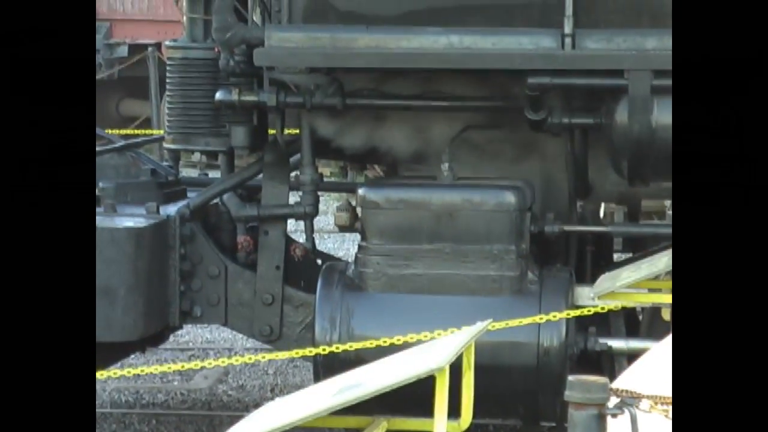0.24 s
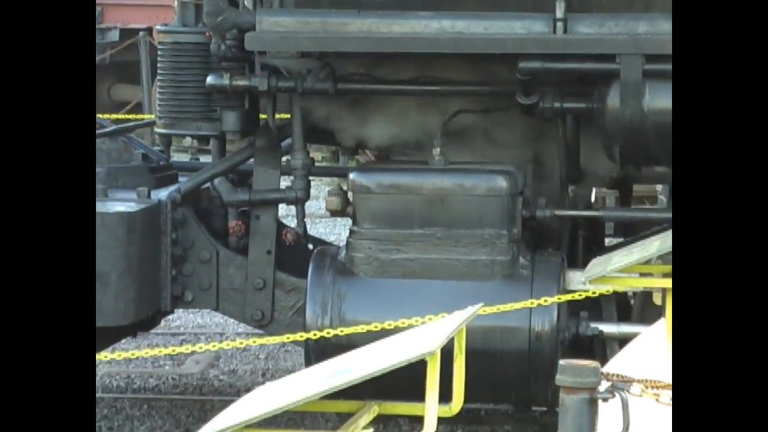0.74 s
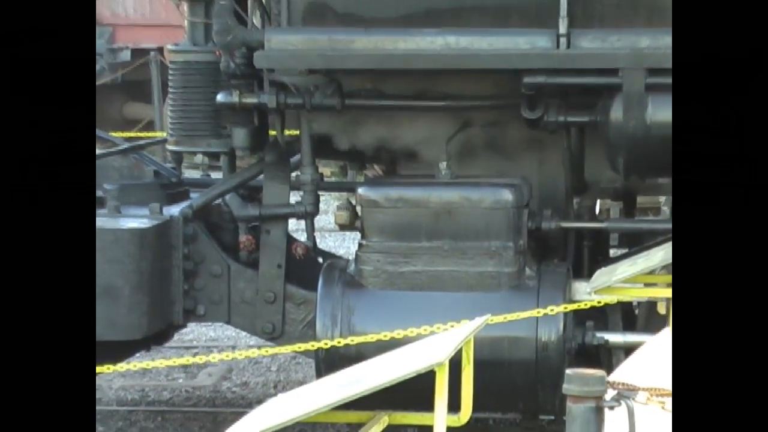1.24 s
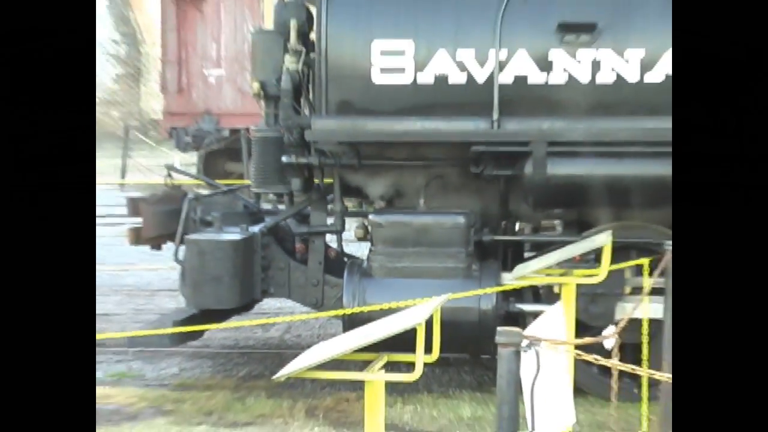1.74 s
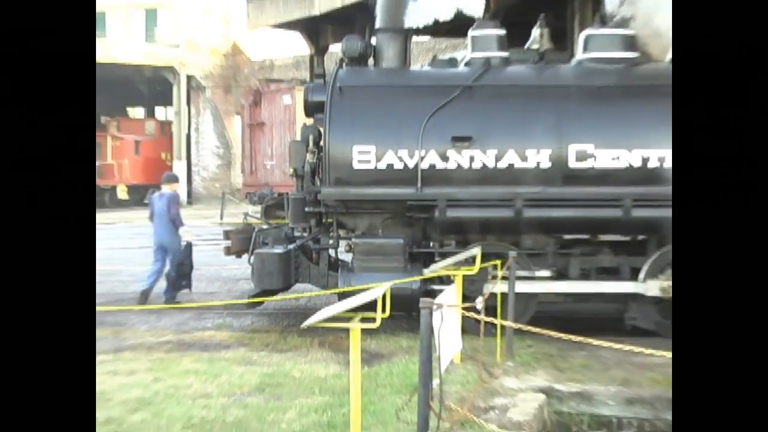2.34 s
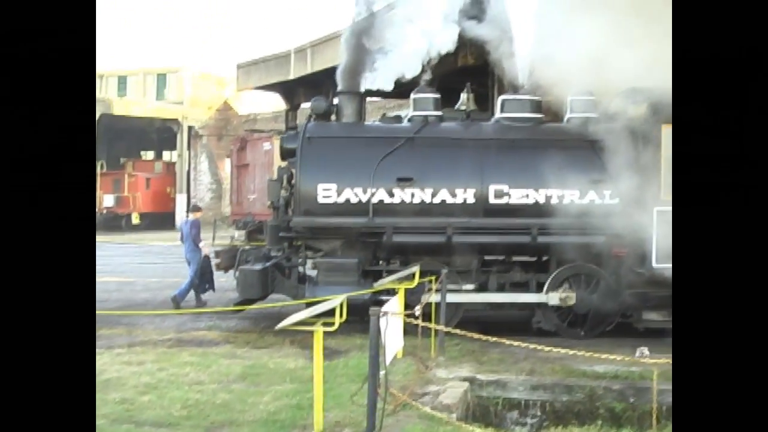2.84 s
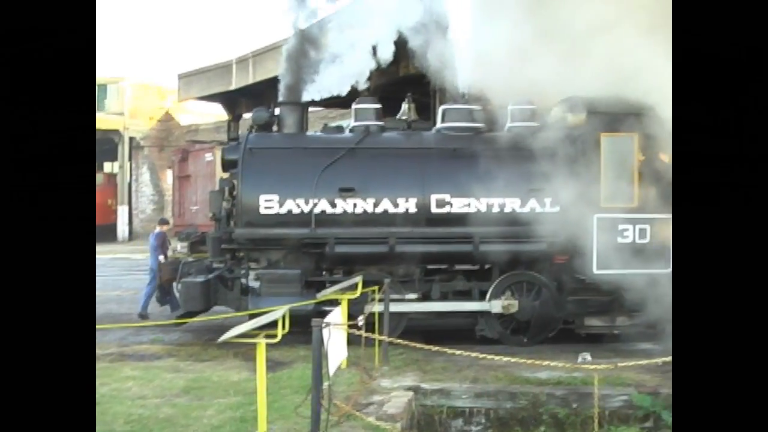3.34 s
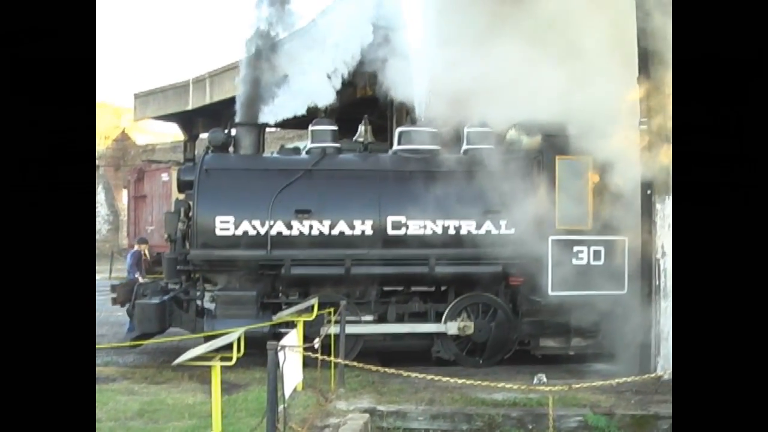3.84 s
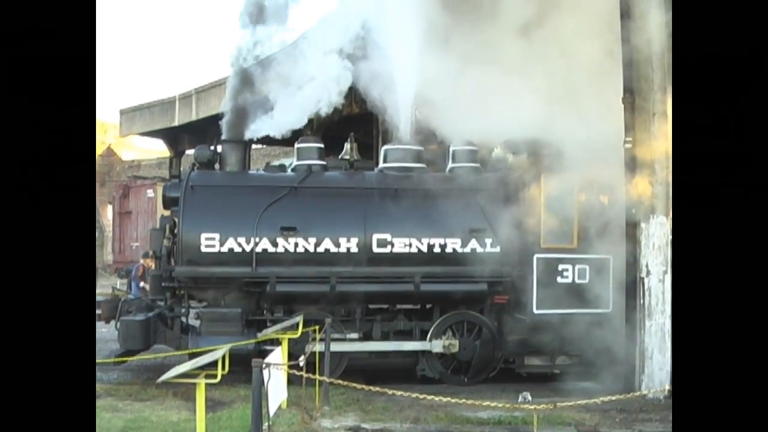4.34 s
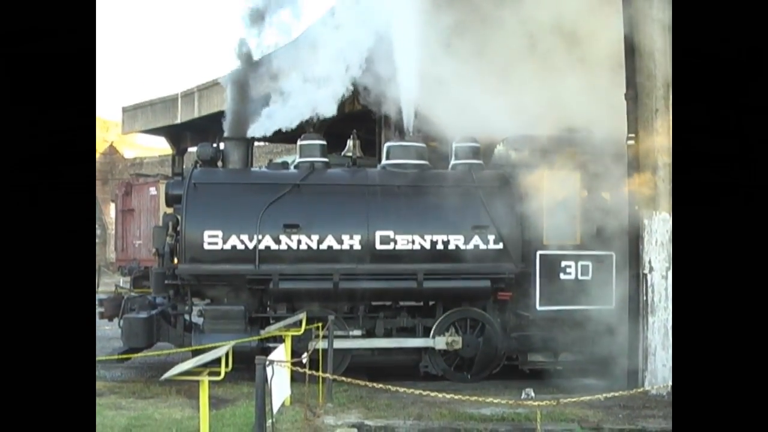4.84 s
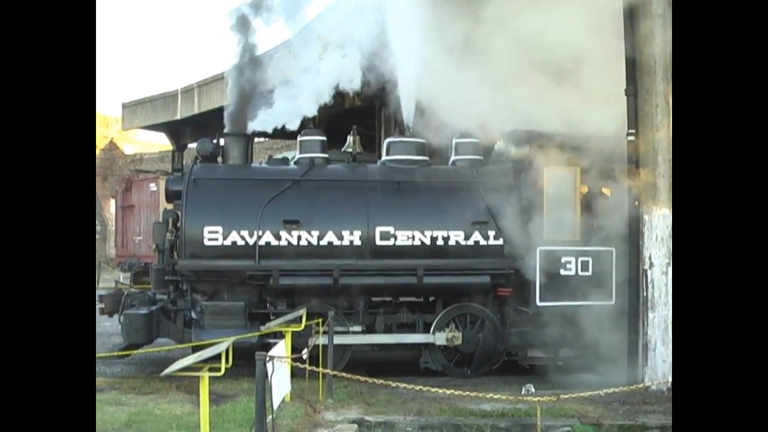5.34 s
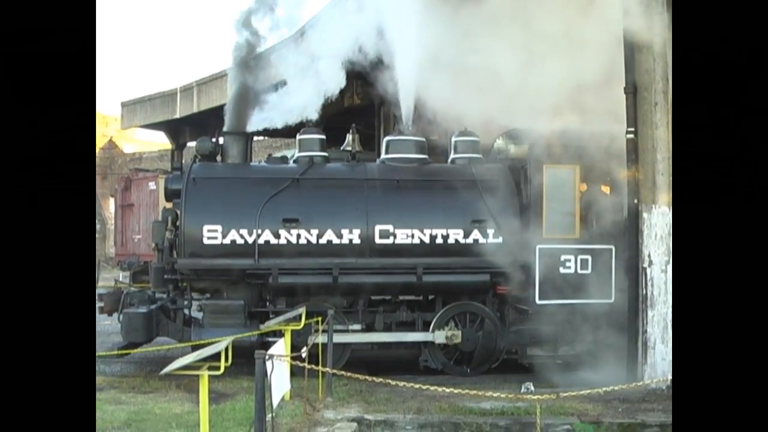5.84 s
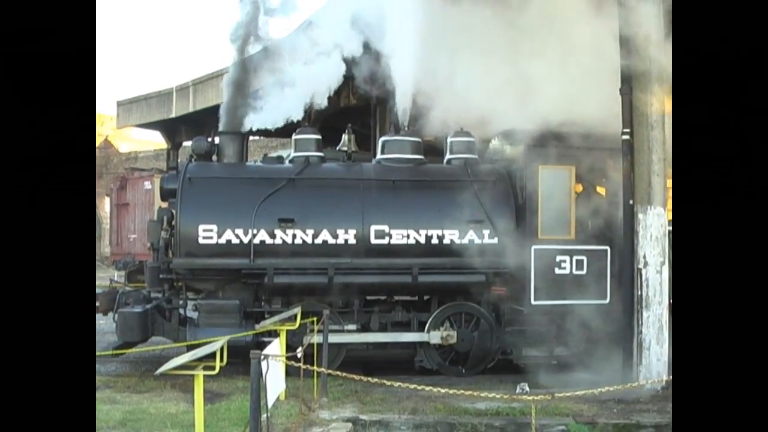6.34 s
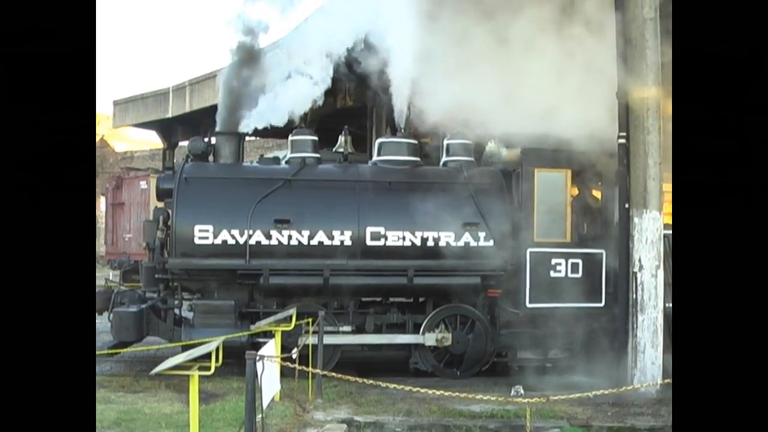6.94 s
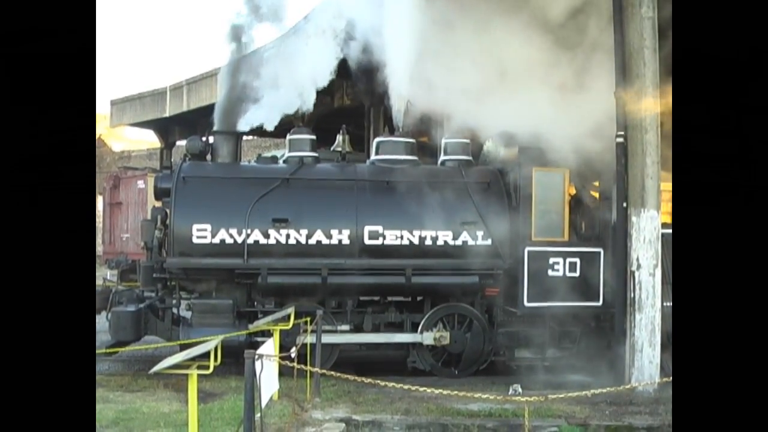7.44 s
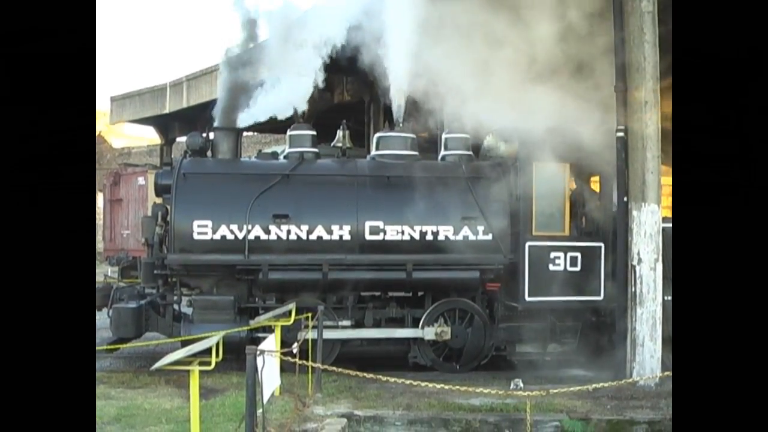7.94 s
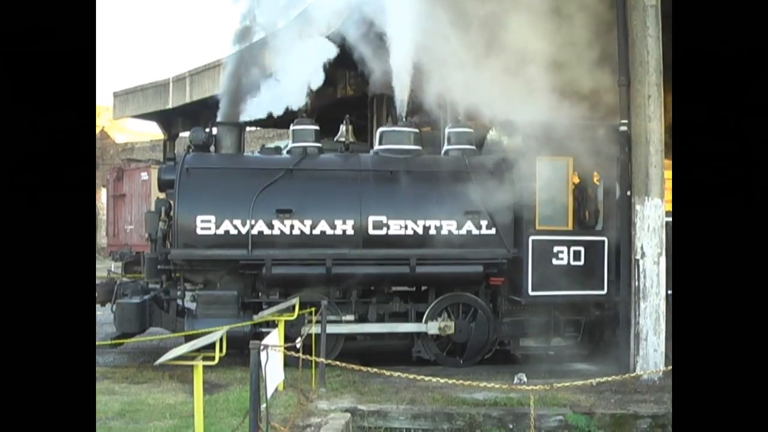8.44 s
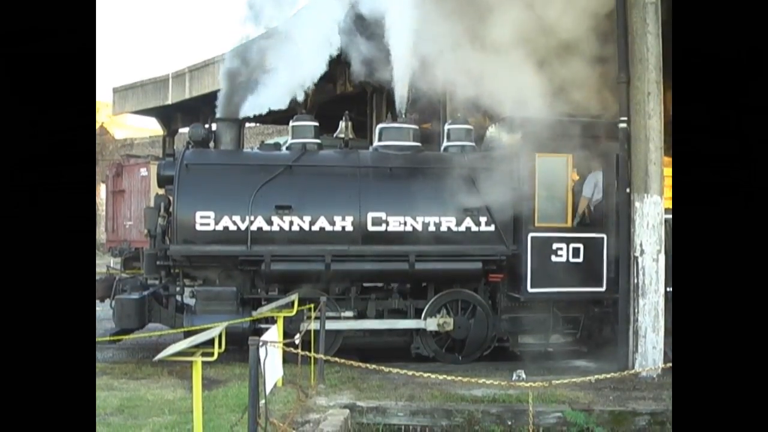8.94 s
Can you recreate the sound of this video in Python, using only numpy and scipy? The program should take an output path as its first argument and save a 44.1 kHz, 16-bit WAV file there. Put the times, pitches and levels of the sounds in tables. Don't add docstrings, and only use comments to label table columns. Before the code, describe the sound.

Loud continuous high-pitched steam hiss from a locomotive safety valve, nearly constant, with slight flutter and a thinner, whistlier edge in the second half.

```python
import sys
import numpy as np
from scipy import signal
from scipy.io import wavfile
from scipy.ndimage import uniform_filter1d, map_coordinates

SR = 44100
rng = np.random.default_rng(int(sys.argv[2]) if len(sys.argv) > 2 else 0)


def volts(x):
    e = np.asarray(x, float) / 20
    return 10 ** e


def generate_wav(sig):
    pcm = np.round(np.clip(np.atleast_2d(sig).T, -1, 1) * 32767).astype(np.int16)
    wavfile.write(sys.argv[1], SR, pcm)


N = 405719
FRAME, HOP = 2048, 512
T = np.arange(N // HOP + 2) * HOP / SR
F = np.arange(FRAME // 2 + 1) * SR / FRAME


def cells():
    noise = rng.standard_normal((len(T) - 1) * HOP)
    return signal.stft(noise, nperseg=FRAME, noverlap=FRAME - HOP)[2]


def sound(z):
    return signal.istft(z, nperseg=FRAME, noverlap=FRAME - HOP)[1][..., :N]


def over_hz(table):
    hz, *values = np.transpose(table)
    return np.array([np.interp(np.log(F + 1), np.log(hz), v)[:, None] for v in values])


def bump(hz, width_hz):
    return 1 / (1 + (2 * (F[:, None] - hz) / width_hz) ** 2)


def walk(rate, count):
    k = max(int(SR / HOP / rate), 1)
    rows = rng.standard_normal((count, len(T)))
    rows = uniform_filter1d(uniform_filter1d(rows, k), k)
    rows /= rows.std()
    place = np.interp(np.log(F + 1), np.log([100, 16000]), [0, count - 1])
    grid = np.meshgrid(place, np.arange(len(T)), indexing="ij")
    return map_coordinates(rows, grid, order=1)


def quick(rows):
    return rows - uniform_filter1d(rows, int(SR / HOP / 6))


# frequency in Hz, density in dB per Hz.
JET = [(15, -71), (25, -39.5), (314, -22), (369, -23), (422, -24), (873, -17), (1050, -17.5), (1490, -12.5),
       (2010, -9.5), (2930, -7.5), (4510, -6.5), (5440, -1), (7720, 0.5), (11300, -8), (15500, -28.5)]
FLOW_HZ = (110, 300, 800, 1900, 3000, 3800, 6500, 12800, 14800)
# level in dB at full lift, level in dB at low lift, dB per unit of boiler pressure.
LAYERS = [
    (0.9, -0.7, 1.5),
    (1.8, -2, -0.5),
    (-1.08, 1.5, -0.2),
    (.5, -0.4, -0.2),
    (-1.84, 1.7, -1.5),
    (2, -1, -0.5),
    (.7, -0.5, .1),
]
# time in seconds, pressure against the mean in arbitrary units.
PRESSURE = [(0, -1.4), (.5, -0.43), (2.2, 0.042), (2.8, 0.056), (3.4, 0.3), (5.9, 0.66), (6.5, -0.21),
            (8, 0.014), (9.2, 0.27)]


def flow_db(turn):
    reseat_s, reseat_takes_s = 6.0, 0.08
    dropped = np.clip((T - reseat_s) / reseat_takes_s + 0.5, 0, 1)
    pressure = np.interp(T, *np.transpose(PRESSURE))
    levels = []
    for high_db, low_db, slope in LAYERS:
        levels.append(high_db + dropped * (low_db - high_db) + slope * pressure)
    hiss, roar, throat, sizzle, seat, lip, top = levels
    steady = 0 * T
    rows = [steady, roar, roar, steady, throat, throat, hiss, sizzle, top]
    regions = np.eye(len(rows))
    spread = [np.interp(np.log(F + 1), np.log(FLOW_HZ), region) for region in regions]
    db = over_hz(JET)[0] + np.transpose(spread) @ rows
    seat_whistle = bump(7870, 1300) * seat
    lip_tone = bump(9300, 600) * lip * turn
    return db + seat_whistle + lip_tone


# frequency in Hz, width in Hz, gain in dB.
PIPES = [(180, 100, 1), (1230, 31, 0.5), (1610, 66, -1), (605, 50, 2), (1088, 72, 3), (1520, 54, 2.5),
         (2040, 80, 1.5), (2990, 58, -1), (3760, 120, -1), (4680, 170, -1), (4900, 250, 0),
         (5270, 390, -1.5), (5720, 170, -3), (6350, 150, 1), (7040, 230, -2.5), (8070, 230, 2.5),
         (8780, 380, -2), (10600, 320, 1), (12500, 330, 2), (13100, 950, -2), (14400, 900, 1.5),
         (905, 150, -1), (15650, 500, -5)]


def pipes_db():
    return sum(gain_db * bump(hz, width) for hz, width, gain_db in PIPES)


# frequency in Hz, width in Hz, gain in dB when facing away.
SHADOWS = [(3700, 740, -3), (1500, 390, 0.5), (6960, 270, 2), (1090, 150, -2), (8400, 300, 1.5),
           (8900, 300, -1), (10700, 600, -3), (12800, 830, 2)]


def shadow_db(turn):
    return sum(gain_db * bump(hz, width) for hz, width, gain_db in SHADOWS) * (1 - turn)


def eddies_db():
    depth_db = 0.45 * np.clip(F[:, None] / 9000, 0.4, 1.6)
    return depth_db * quick(walk(24, count=14)) + 1.17 * walk(1.3, count=220)


# delay in ms, share of the direct sound facing away, share facing the jet.
ECHOES = [(0.487, -0.11, -.15), (.69, 0.096, .06), (.78, 0.063, 0.14), (1.53, 0.01, -0.051),
          (1.66, 0.032, 0.13), (1.88, 0.092, 0.055), (2.57, -0.077, -.13), (2.72, 0.22, 0.17),
          (3.33, -0.029, 0.0026), (3.8, 0.037, .04), (4.6, 0.12, 0.078), (5.5, -.03, -.04)]


def yard(turn):
    comb = 0
    for ms, away, facing in ECHOES:
        delay = np.exp(-2j * np.pi * F[:, None] * ms / 1000)
        comb = comb + delay * (away + turn * (facing - away))
    echo_top_hz = 6700
    return 1 + comb / (1 + (F[:, None] / echo_top_hz) ** 2)


# frequency in Hz, left minus right level in dB,
# phase lead of the right in radians, level of unrelated side sound in dB.
AWAY = [(30, .3, 0, -16), (200, 3, 0, -6.5), (800, 0.8, 0.068, -10), (1500, -1, 0.16, -24),
        (3700, 0.5, -0.09, -17), (4670, 1, 0, -18), (6200, -0.5, 0, -17), (8300, 1.6, -.05, -20),
        (9600, 5.5, -.05, -13), (10300, 7, 0, -11), (11000, 8, .8, -6), (11900, 9, 1.25, -7),
        (13800, -1, 0.98, -10), (15300, .2, .3, -15)]
# frequency in Hz, left minus right level in dB,
# phase lead of the right in radians, level of unrelated side sound in dB.
FACING = [(30, 4, 0, -19), (200, -1.5, 0, -8), (800, -.5, 0, -11.5), (1530, -1.5, 0, -33),
          (3900, 1.2, 0, -15), (4940, 0.5, 0.05, -23), (6060, -2.5, 0.034, -18), (8300, 0.3, -.3, -15.5),
          (9600, 4.5, -0.14, -14), (11000, 4, 0.16, -11), (11700, 4, .45, -9), (12500, .8, .6, -12),
          (13800, -3, 0.14, -13), (15500, 0, 0, -15.5)]


def ports(colour, turn):
    pan_db, lead, side_db = (1 - turn) * over_hz(AWAY) + turn * over_hz(FACING)
    direct = colour * cells()
    scattered = colour * volts(side_db) * cells()
    port = volts(pan_db / 2) * np.exp(-0.5j * lead)
    left = direct * port + scattered
    right = direct / port - scattered
    mid = np.abs(port + 1 / port) / 2
    return sound(np.array([left, right]) / mid)


# time in seconds, half width in seconds, dip in dB.
STUMBLES = [
    (5.985, .02, -3.8),
    (8.6, .015, -2.5),
    (2.28, .015, -2),
    (5.33, .015, -2),
]


def valve():
    t = np.arange(N) / SR
    falter_db = sum(dip_db * np.exp(-((t - at) / half) ** 2) for at, half, dip_db in STUMBLES)
    flutter_db = 0.35 * np.interp(t, T, quick(walk(30, count=1))[0])
    return volts(falter_db + flutter_db)


# frequency in Hz, width in Hz, level in dB before the valve reseats, level in dB
COLUMNS = [
    (376.6, 5, -52.5, -66),
    (1068, 7.3, -53, -46.5),
    (1143, 12, -63, -53),
    (119, 5.4, -65.5, -60.5),
    (603, 12, -61, -62),
    (355.5, 10, -55, -69),
]
# time in seconds, share of the after-reseating level from 0 to 1.
DRAUGHT = [(0, 0.1), (1.5, 0), (3, 0.15), (3.8, 0), (5, 0), (5.5, 0.6), (6.001, 1.1), (7, 0.78), (9.2, 1.1)]


def columns():
    draught = np.interp(np.arange(N) / SR, *np.transpose(DRAUGHT))
    out = 0
    for hz, width, before_db, after_db in COLUMNS:
        b, a = signal.iirpeak(hz, hz / width, fs=SR)
        tone = signal.lfilter(b, a, rng.standard_normal(N))
        out = out + tone / tone.std() * volts(before_db + draught * (after_db - before_db))
    return out


# time in seconds, aim from 0 facing away to 1 facing the jet.
TURN = [
    (0, 0.15),
    (2.8, 0.059),
    (3.8, 0.93),
    (9.2, 1),
]


def scene():
    turn = np.clip(np.interp(T, *np.transpose(TURN)), 0, 1)
    jet_db = flow_db(turn) + pipes_db() + shadow_db(turn) + eddies_db()
    pair = ports(volts(jet_db) * yard(turn), turn)
    high = signal.butter(1, 1900, "high", fs=SR, output="sos")
    pair = pair + signal.sosfiltfilt(high, pair) * (valve() - 1)
    return pair * volts(-13.5) / pair.mean(axis=0).std() + columns()


def roll_off(x):
    return signal.sosfilt(signal.butter(12, 15690, fs=SR, output="sos"), x)


def record(dry):
    lean = dry + 0.13 * dry ** 2
    lean = signal.sosfilt(signal.butter(2, 105, "high", fs=SR, output="sos"), lean)
    rumble = signal.sosfilt(signal.butter(1, 40, fs=SR, output="sos"), rng.standard_normal(N))
    mix = lean + volts(-69) * rumble / rumble.std()
    return roll_off(np.clip(mix, -1, 1))


dry = scene()
out = record(dry)
generate_wav(out)
```